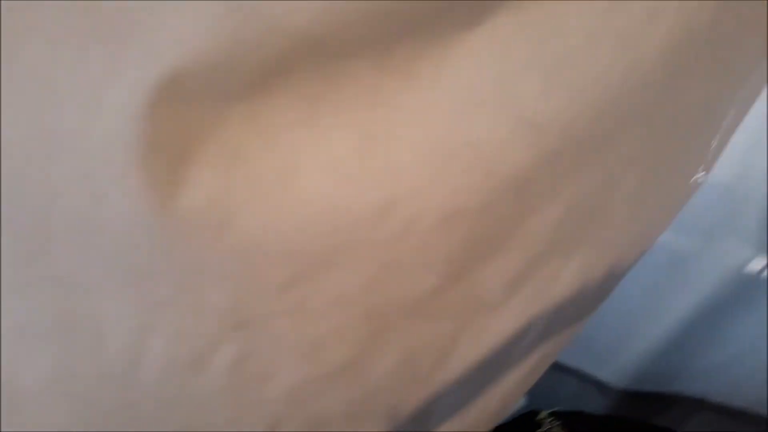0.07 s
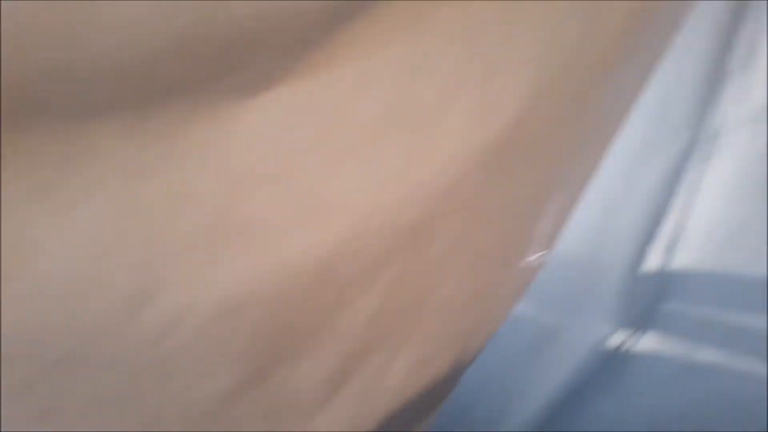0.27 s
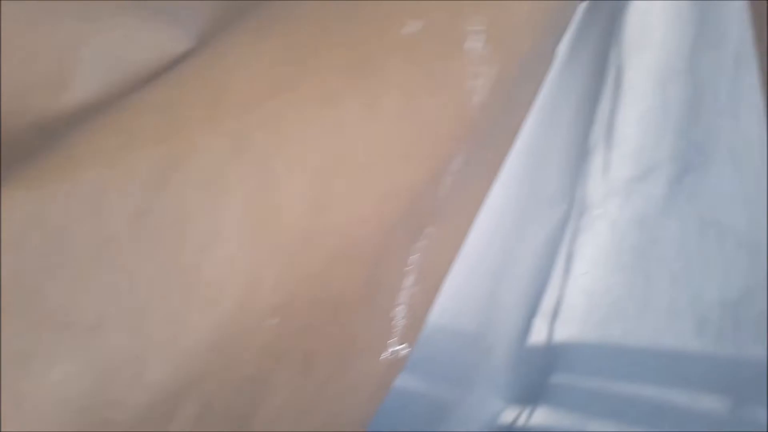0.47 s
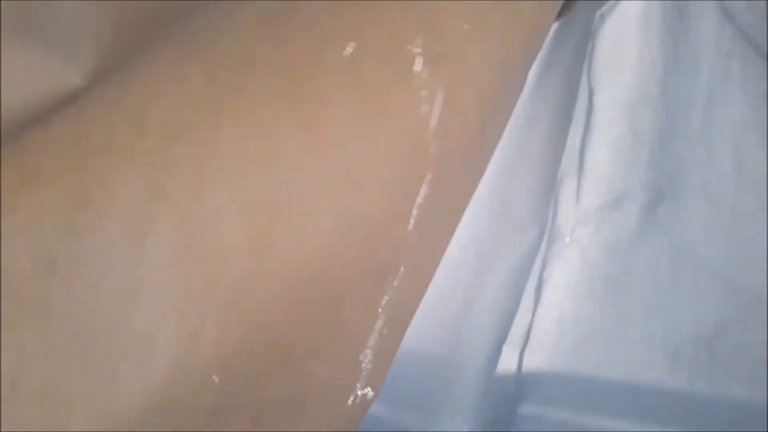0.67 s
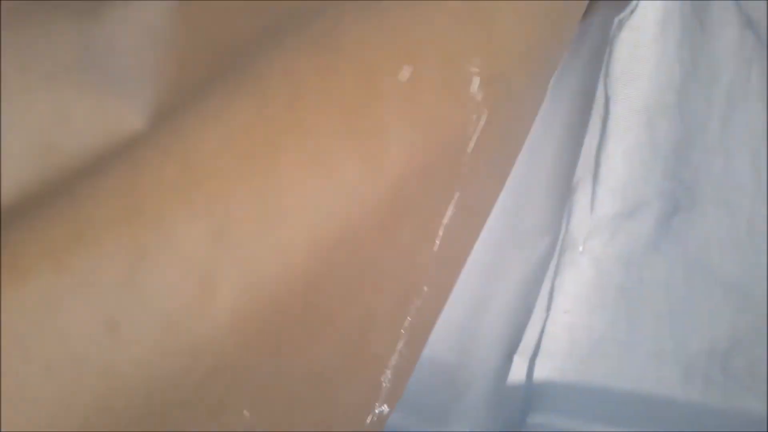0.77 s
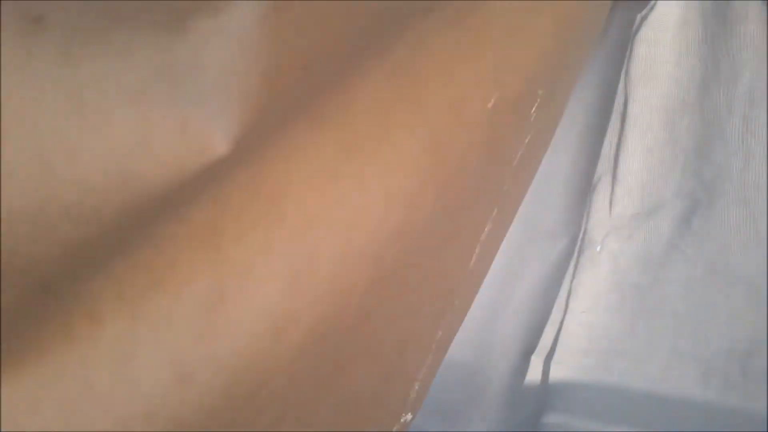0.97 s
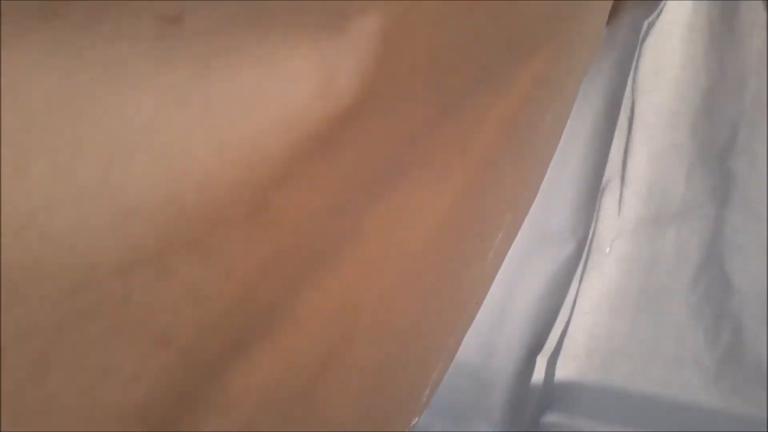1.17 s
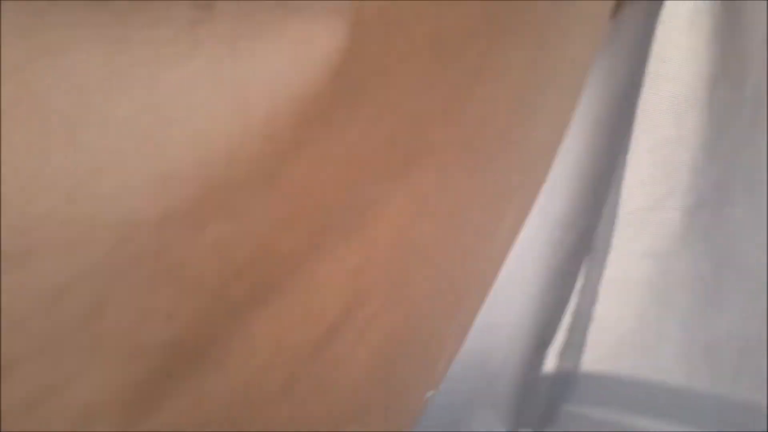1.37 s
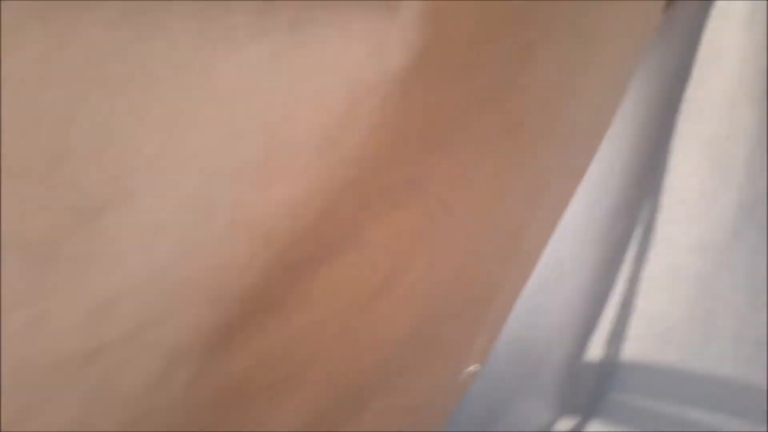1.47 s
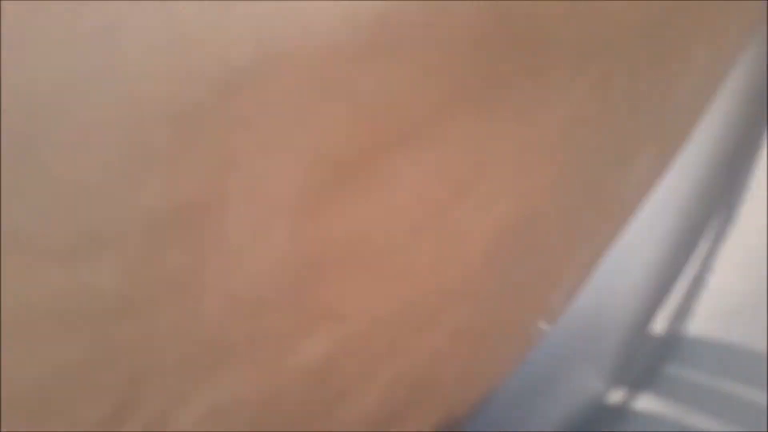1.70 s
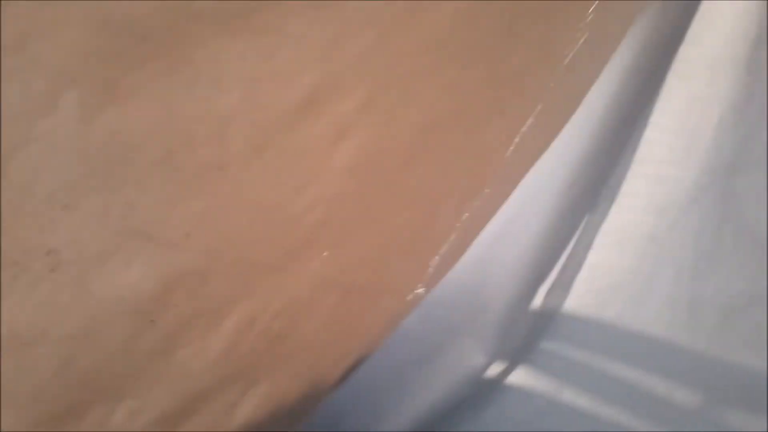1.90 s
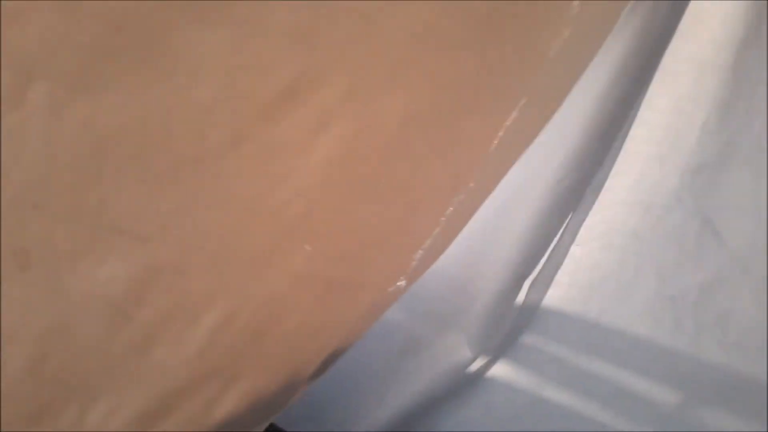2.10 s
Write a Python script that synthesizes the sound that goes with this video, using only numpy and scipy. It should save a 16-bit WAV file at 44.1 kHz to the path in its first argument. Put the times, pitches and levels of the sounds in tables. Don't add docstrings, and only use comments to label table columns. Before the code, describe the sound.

Canvas wall of a camper flaps in gusty wind, heard close from inside with two spaced microphones: faint low rumble and soft outdoor roar, then light ticks and rustles, then hard slaps and thumps.

```python
import sys
import numpy as np
from scipy import signal
from scipy.fft import rfft, irfft
from scipy.io import wavfile
from scipy.ndimage import uniform_filter1d

SR = 44100
rng = np.random.default_rng(int(sys.argv[2]) if len(sys.argv) > 2 else 0)


def magnitude_from_level(level_db):
    exponent = np.asarray(level_db, float) / 20
    return 10 ** exponent


def file_out(sig):
    cols = np.atleast_2d(sig).T
    lim = np.clip(cols, -1, 1)
    pcm = np.round(lim * 32767).astype(np.int16)
    wavfile.write(sys.argv[1], SR, pcm)


N = 94726
CALM_DB = -42
EAR_LAG_MS = .49


def evened(x):
    return x / np.sqrt(np.mean(x ** 2) + 1e-20)


def read(points, hz):
    f, value = np.transpose(points)
    return np.interp(np.log(hz + 1), np.log(f + 1), value)


def add(mix, s, sound):
    part = mix[max(round(s * SR), 0):][:len(sound)]
    part += sound[:len(part)]


def noise(colour_db, same, lag_ms, patch_db, flicker_db, size):
    hop = size // 4
    frames = N // hop + 5
    hz = np.fft.rfftfreq(size, 1 / SR)[:, None]
    a, b, c, d, patch = rng.standard_normal((frames, len(hz), 5)).T
    patch = uniform_filter1d(patch, size=len(hz) // 24, axis=0)
    patch = evened(uniform_filter1d(patch, size=9, axis=1))
    flicker = evened(uniform_filter1d(rng.standard_normal(frames), size=5))
    like = np.clip(same(hz), 0, 1)
    left = a + 1j * b
    shared = like * left * np.exp(-2j * np.pi * hz * lag_ms / 1000)
    right = shared + np.sqrt(1 - like ** 2) * (c + 1j * d)
    t = np.arange(frames) * hop / SR
    level_db = colour_db(hz, t) + patch_db * patch + flicker_db * flicker
    z = np.array([left, right]) * magnitude_from_level(level_db)
    return signal.istft(z, nperseg=size, noverlap=size - hop)[1][:, :N]


def beat(hz, cycles):
    rise = .2 + .3 * cycles
    u = np.arange(-3 * rise, 1 + 6 * cycles, hz / SR)
    shape = np.where(u < 0, np.exp(-.5 * (u / rise) ** 2), np.exp(-u / cycles))
    sag = 1 + .1 * np.maximum(u, 0) / (1 + cycles)
    wave = shape * np.cos(2 * np.pi * u / sag)
    centred = wave - shape * wave.sum() / shape.sum()
    return -u[0] / hz, centred


def add_beat(out, s, db, hz, cycles, lag_ms):
    lead, wave = beat(hz, cycles)
    add(out[0], s - lead - lag_ms / 2000, magnitude_from_level(db) * wave)
    add(out[1], s - lead + lag_ms / 2000, magnitude_from_level(db) * wave)


# (time [s], level [dB])
GUST = [(0, -46), (.1, -45), (.3, -49), (.42, -45), (.54, -40), (.64, -44.5), (.76, -42), (.87, -37.5),
        (.97, -38), (1.08, -36), (1.22, -35.5), (1.35, -38), (1.5, -37.5), (1.62, -36.5), (1.77, -34),
        (1.93, -37.5), (2.04, -34), (2.15, -30.5)]


def gust_db(t):
    return np.interp(t, *np.transpose(GUST))


# (frequency [Hz], density [dB per Hz])
ROAR_COLOUR = [(150, -52), (500, 0), (1000, -23), (2500, -7), (5200, -7.5), (7000, -5), (7700, -16.5),
               (15500, -19.5)]


def roar():
    def colour(hz, t):
        follow = 1 / (1 + (hz / 5000) ** 2)
        return read(ROAR_COLOUR, hz) + (gust_db(t) - CALM_DB) * follow

    wind = noise(colour, lambda hz: .3, EAR_LAG_MS, patch_db=1.5, flicker_db=1.0, size=512)
    return magnitude_from_level(-52.5) * evened(wind)


# (frequency [Hz], density [dB per Hz])
RUMBLE_COLOUR = [(25, -44), (60, -1.5), (110, -5.5), (300, -0.5), (550, -6.5), (1000, -13.5), (2500, -24),
                 (6000, -38.5)]
# (frequency [Hz], likeness [0-1])
RUMBLE_SAME = [(60, 0.58), (200, 0.97), (640, 0.3), (1400, 0)]


def rumble():
    def colour(hz, t):
        bass = np.clip(np.log2(250 / (hz + 1)), 0, 1)
        return read(RUMBLE_COLOUR, hz) + (gust_db(t) - CALM_DB) * bass

    cloth = noise(colour, lambda hz: read(RUMBLE_SAME, hz), 0.082, patch_db=3.02, flicker_db=0.46, size=1024)
    return magnitude_from_level(gust_db(np.arange(N) / SR)) * evened(cloth)


def drumming():
    beats_per_s, pan_range_db = 210, 3
    hits = rng.random(N) < beats_per_s / SR
    kind = rng.integers(0, 16, N)
    out = np.zeros((2, N))
    for k, hz in enumerate(np.geomspace(90, 842, num=16)):
        cycles, pan, lag = rng.random(3)
        wave = beat(hz, .5 + 1.4 * cycles)[1]
        x = signal.oaconvolve(1.0 * (hits & (kind == k)), wave)[:N]
        x = x * magnitude_from_level(read(RUMBLE_COLOUR, hz) / 2)
        later = np.roll(x, round(24 * (lag - .6)))
        out += [x * magnitude_from_level(pan_range_db * (pan - .5)), later * magnitude_from_level(pan_range_db * (.5 - pan))]
    return magnitude_from_level(-8 + gust_db(np.arange(N) / SR)) * evened(out)


# (time [s], peak level [dB], pitch [Hz])
HEAVES = [(0.619, -38, 80), (.862, -30, 110), (1.48, -33, 70), (1.721, -31, 75), (0.886, -29.5, 158),
          (0.947, -33, 76), (1.08, -23.5, 100), (1.22, -24, 102), (1.656, -47, 103), (1.853, -24.5, 90),
          (2.091, -30, 100)]


def heaves():
    out = np.zeros((2, N))
    for s, db, hz in HEAVES:
        add_beat(out, s, db, hz, cycles=.9, lag_ms=0)
    return out


# (start [s], length [s], level [dB], left minus right [dB], sheen [dB])
RUSTLES = [(0.212, 0.055, -54.5, -2, 6), (0.3, 0.052, -48.5, -1.5, 7), (0.362, 0.088, -44, -2, 4.5),
           (0.507, 0.055, -51.5, -3, 7), (0.578, 0.07, -51.5, -3, 7.5), (0.652, 0.075, -46, -0.5, 7),
           (0.746, 0.13, -46.5, -1.5, 5), (0.899, 0.091, -49.5, -5, 2), (1.072, 0.035, -37, 1, 1.5),
           (1.127, 0.017, -45.5, 0, 3), (1.164, 0.13, -47.5, -3, 0.5), (1.447, 0.065, -45, 2.5, 4),
           (1.517, 0.17, -39, 2.5, 7), (1.631, 0.1, -40, 1, 10), (1.46, .01, -48, 0, 6),
           (1.821, 0.04, -47, 0.5, 5.5), (2.006, 0.06, -42, -1, -0.5), (2.065, .09, -47.5, -4, -22)]
# (frequency [Hz], density [dB per Hz])
RUSTLE_COLOUR = [(300, -6), (1000, -6), (2500, -5), (5200, -9.5), (6850, -3), (7750, -22.5), (11000, -20),
                 (15500, -22.5)]


def rustle():
    rise_s, fall_s, sheen_hz = .008, .011, 7400
    t = np.arange(N) / SR
    power = np.zeros((2, 2, N))
    for s, length, db, pan_db, sheen_db in RUSTLES:
        before, after = np.maximum(s - t, 0), np.maximum(t - s - length, 0)
        edge = np.exp(-before / rise_s - after / fall_s)
        body = edge * magnitude_from_level(db + pan_db * np.array([[.5], [-.5]]))
        power += np.array([body, body * magnitude_from_level(sheen_db)]) ** 2
    hiss = noise(lambda hz, s: read(RUSTLE_COLOUR, hz) + 0 * s, lambda hz: .75 - hz / 25000,
                 EAR_LAG_MS, patch_db=2.34, flicker_db=1.0, size=256)
    slips = uniform_filter1d(rng.exponential(1, N) - 1, size=24)
    grain = magnitude_from_level(0.5 * evened(slips))
    hiss = evened(hiss * [grain, np.roll(grain, round(EAR_LAG_MS * SR / 1000))])
    low = irfft(rfft(hiss) * (np.fft.rfftfreq(N, 1 / SR) < sheen_hz), N)
    return np.sqrt(power[0]) * low + np.sqrt(power[1]) * (hiss - low)


# (time [s], peak level [dB], pitch [Hz], t60 [s])
PING = (2.031, -39, 13280, .045)


def ping():
    s, db, hz, t60 = PING
    out = np.zeros(N)
    t = np.arange(8000) / SR
    envelope = magnitude_from_level(db - 60 * t / t60) * np.minimum(t / 0.00064, 1)
    add(out, s, envelope * np.sin(2 * np.pi * hz * t))
    return out * magnitude_from_level(np.array([[-8], [0]]))


# (time [s], peak level before a 6.5 dB lift [dB], top [Hz], rattle t60 [s], right ear later
# by [ms])
SNAPS = [(.4265, -27, 6000, .008, .46), (1.1842, -16.5, 4600, .04, .38), (1.856, -38, 4500, .02, -.2),
         (1.278, -33, 5500, .025, -.1), (2.0893, -27, 2600, .045, .4), (1.920, -41, 12000, .015, -.4),
         (.659, -39, 4500, .05, -.14), (.965, -38, 2500, .08, -.2), (1.240, -36, 5000, .02, .48),
         (1.476, -37, 14000, .06, -.1), (2.1445, -21, 2900, .02, .3)]


def snaps():
    rise_s, low_hz, lead_s = .0006, 420, .002
    out = np.zeros((2, N))
    t = np.arange(4096) / SR
    hz = np.fft.rfftfreq(len(t), 1 / SR)
    for s, db, top_hz, t60, lag_ms in SNAPS:
        middle, side = rng.standard_normal((2, len(t)))
        rattle = middle + .5 * side * [[1], [-1]]
        rattle = rattle * magnitude_from_level(-60 * t / t60) * np.sqrt(top_hz / SR) * np.minimum(t / rise_s, 1)
        x = rattle + .8 * (t == 0)
        air = magnitude_from_level(-29) * min(top_hz / 4000, 1.5) ** 3 * (hz / top_hz) ** 4
        dull = (1 + air) / (1 + 1.3j * hz / top_hz - (hz / top_hz) ** 2) ** 2
        bass_cut = (1j * hz / low_hz) / (1 + 1j * hz / low_hz)
        delay = lead_s + np.array([[-.5], [.5]]) * lag_ms / 1000
        y = irfft(rfft(x) * dull * bass_cut * np.exp(-2j * np.pi * hz * delay))
        for ear in range(2):
            add(out[ear], s - lead_s, magnitude_from_level(db + 6.5) * y[ear] / abs(y).max())
    return out


# (time [s], peak level [dB], pitch [Hz], ring [cycles], right ear later by [ms])
KNOCKS = [(.3255, -38, 2290, 4.3, .45), (0.399, -43, 2005, 39, 0.63), (1.1852, -11, 506, 0.56, 0.42),
          (1.19, -25.5, 1634, 6, .2), (1.648, -19.5, 605, 1.2, 0.17), (1.6927, -7, 734, 0.41, -0.21),
          (1.6914, -19, 1750, 1.1, -0.075), (1.9717, -11.5, 1052, 0.19, -0.11),
          (2.0903, -13, 930, 1.8, 0.28), (2.1452, -15, 1120, 0.7, 0.0048), (.199, -40, 625, 1.4, .2),
          (1.692, -24, 2300, 1, 0), (1.1765, -32, 830, 2, .2), (1.204, -24, 300, 1, .3),
          (.752, -33.5, 1000, 1, .2), (1.407, -31, 3500, 0.66, 0), (1.186, -25.5, 1516, 3, -0.19),
          (1.66, -38, 2070, 14, 0), (.454, -37.5, 930, 2, 0.12), (.509, -42.5, 1650, 2.7, 0.09),
          (.559, -35, 885, 2.9, 0.23), (1.188, -19.5, 2230, 6.6, 0.11), (1.278, -41, 880, 1.4, 0.38),
          (1.750, -35.5, 1120, 2, .2), (1.8175, -26.5, 855, 2, 0.49), (1.848, -38, 1860, 6.9, 0.17),
          (1.862, -35, 1790, 8, 0.16), (1.894, -26.5, 1090, 1.2, 0.15), (1.9736, -29, 950, 2.1, 0),
          (2.011, -34.5, 2140, 6.1, 0.0082), (2.0344, -25, 1430, 1.6, 0.17), (2.025, -29.5, 626, 8.6, 0.17),
          (2.145, -16, 2330, 1.8, 0.067), (2.135, -36, 3500, 5.4, 0.26)]


def knocks():
    out = np.zeros((2, N))
    for s, db, hz, cycles, lag_ms in KNOCKS:
        add_beat(out, s, db, hz, cycles, lag_ms)
    return out


# (time [s], peak level [dB], pitch [Hz], ring [cycles])
THUMPS = [(.199, -37, 330, 5.1), (0.548, -34, 425, 1.5), (0.454, -39, 525, 2), (0.5747, -24, 680, 1.8),
          (.6984, -31, 620, 1.5), (0.7557, -22.5, 210, 0.83), (0.775, -35, 188, 2.5), (.917, -30.5, 278, 4),
          (1.070, -21, 198, 0.67), (1.082, -27.5, 476, 2), (1.101, -27.5, 192, 0.96),
          (1.1123, -24.5, 285, 0.74), (1.211, -16, 288, 0.82), (1.229, -23, 200, 0.69),
          (1.255, -22.5, 154, 0.71), (1.5392, -15.5, 312, 0.49), (1.6543, -9, 165, 0.23),
          (1.710, -29, 240, 5.4), (1.745, -25, 373, 2.6), (1.8128, -17, 250, 0.44),
          (1.822, -21.5, 500, 1.9), (1.892, -25, 556, 2.7), (1.974, -17, 324, 0.65),
          (1.993, -18, 633, 0.43), (2.010, -24.5, 283, 1.6), (2.0961, -19, 254, 0.48),
          (2.106, -20.5, 470, 1), (1.218, -13.5, 270, 0.16), (0.347, -38.5, 293, 2.5),
          (.392, -42, 208, 1.3), (0.469, -41, 336, 3.3), (0.533, -38, 484, 1.7), (0.5778, -24.5, 423, 1.5),
          (.590, -35, 410, 1.7), (0.873, -35, 340, 1.4), (.31, -41.5, 243, 2.3), (.09, -42, 204, 1.8),
          (1.006, -35.5, 248, 2), (1.507, -26, 318, 1.3), (1.769, -26.5, 300, 0.68), (1.791, -29.5, 453, 2),
          (1.889, -28, 171, .8), (1.94, -28.5, 304, 0.96), (2.046, -30, 410, 1.4), (2.08, -25, 300, 0.72),
          (2.1002, -17.5, 510, 0.84), (2.117, -22.5, 480, 0.87), (2.140, -26, 258, .7),
          (2.1465, -16.5, 444, 0.96)]


def thumps():
    out = np.zeros((2, N))
    for s, db, hz, cycles in THUMPS:
        add_beat(out, s, db, hz, cycles, lag_ms=0.19)
    return out


def cabin(x):
    taps = rng.choice([-1., 1.], (2, SR // 2)) * (rng.random((2, SR // 2)) < .05)
    taps[1] = .6 * taps[0] + .8 * taps[1]
    taps[:, :150] = 0
    hz, t, z = signal.stft(taps, SR, nperseg=256)
    t60 = read([(200, .12), (6000, .06)], hz)[:, None]
    tail = signal.istft(z * magnitude_from_level(-60 * t / t60), SR, nperseg=256)[1]
    return signal.fftconvolve(x, tail / np.linalg.norm(tail[0]), axes=1)[:, :N]


def scene():
    hits = heaves() + ping() + snaps() + knocks() + thumps()
    return roar() + rumble() + drumming() + rustle() + hits + magnitude_from_level(-13) * cabin(hits)


def roll_off(x):
    return signal.sosfilt(signal.butter(12, 15810, fs=SR, output="sos"), x)


# (frequency [Hz], left minus right [dB])
EAR_BALANCE = [(40, -1), (150, 1), (700, -1), (2400, -4), (4400, 3.5), (9000, 0.5)]


def record(dry):
    hz = np.fft.rfftfreq(N, 1 / SR)
    balance = magnitude_from_level(read(EAR_BALANCE, hz) * np.array([[.5], [-.5]]))
    bass_cut = hz ** 2 / (hz ** 2 + 42 ** 2)
    mix = irfft(rfft(dry) * balance * bass_cut * (hz < 15850), N)
    return roll_off(mix)


dry = scene()
out = record(dry)
file_out(out)
```